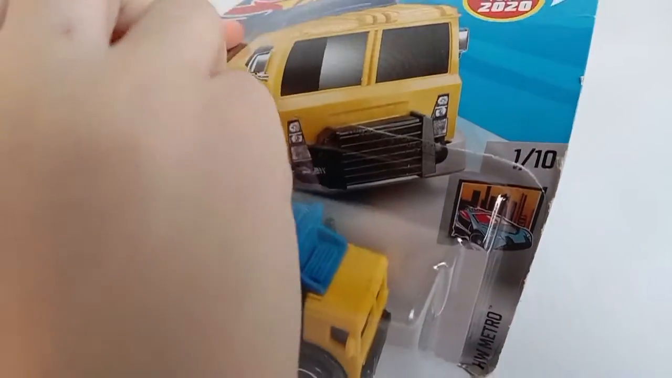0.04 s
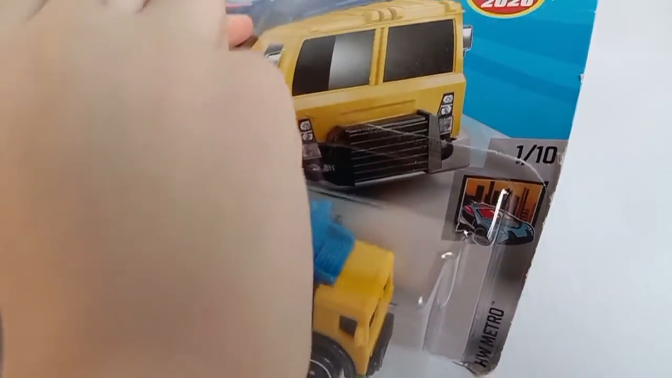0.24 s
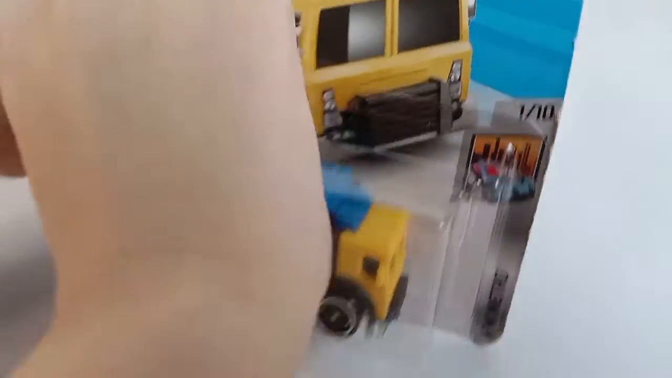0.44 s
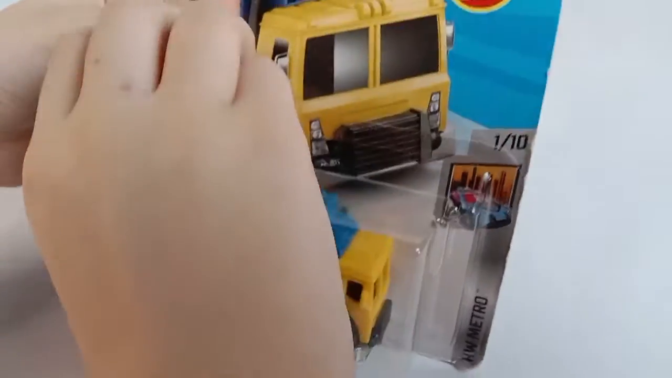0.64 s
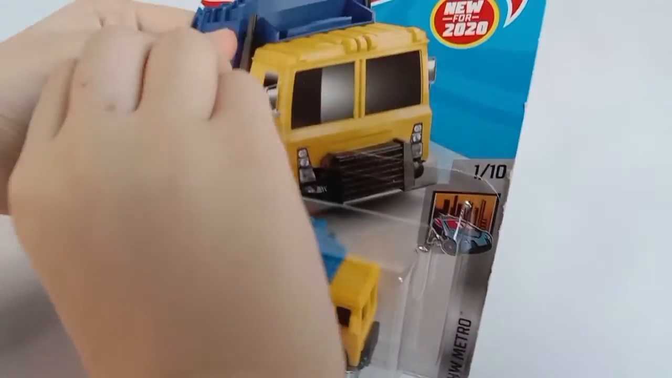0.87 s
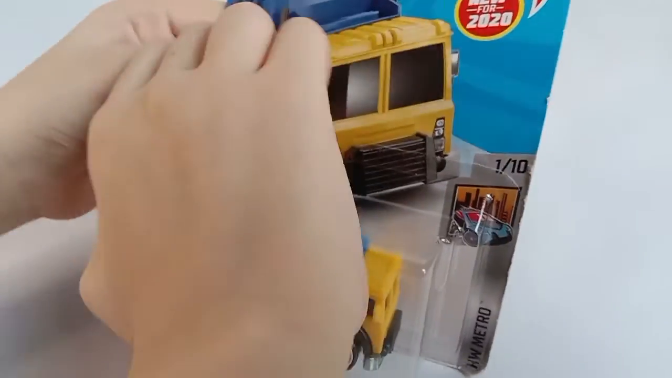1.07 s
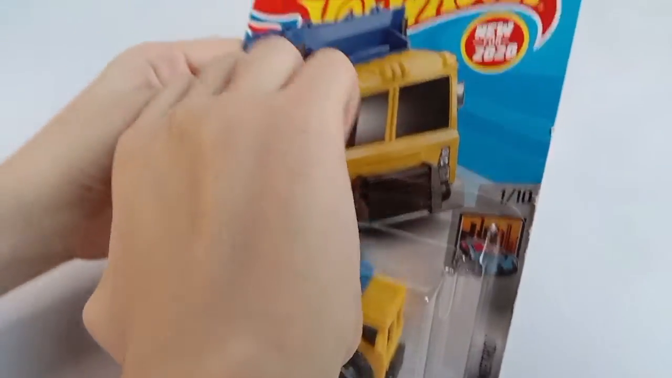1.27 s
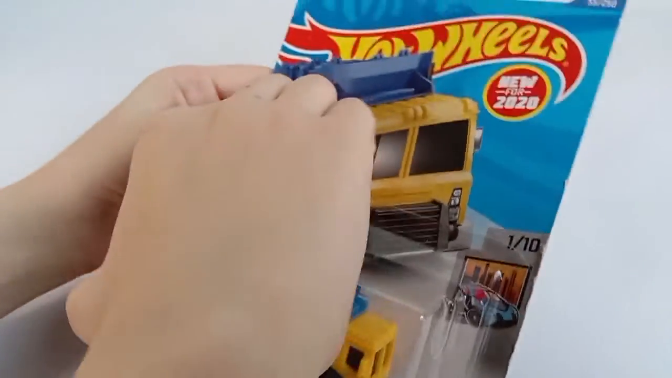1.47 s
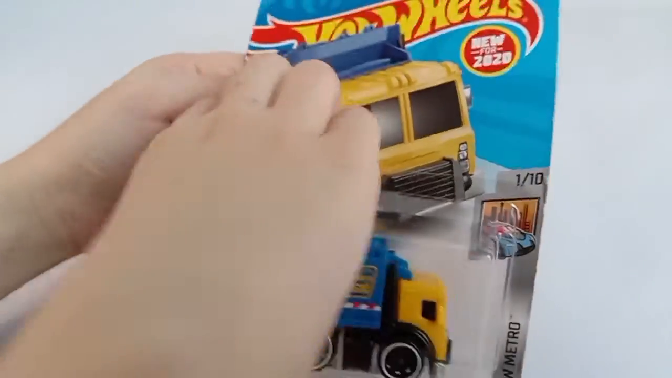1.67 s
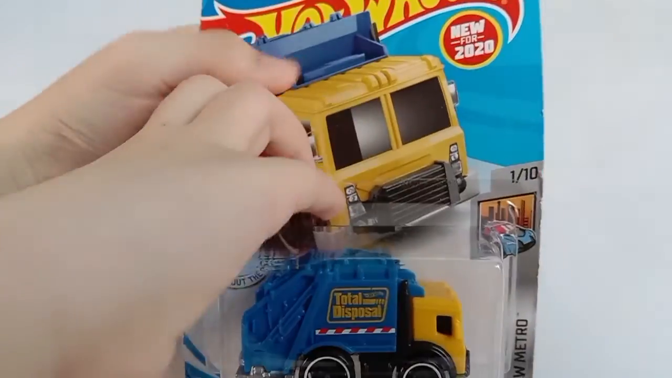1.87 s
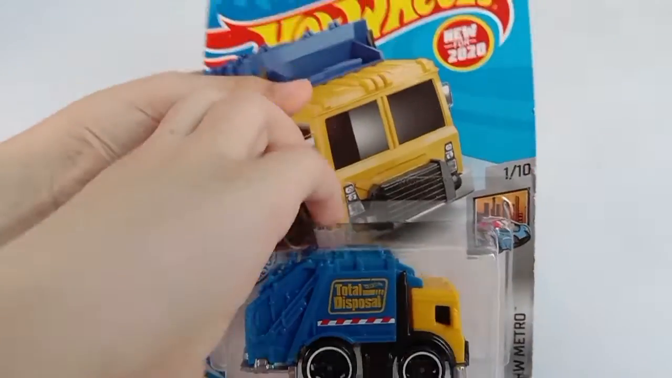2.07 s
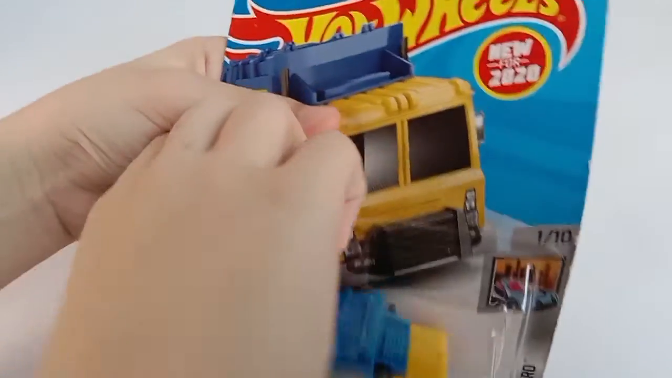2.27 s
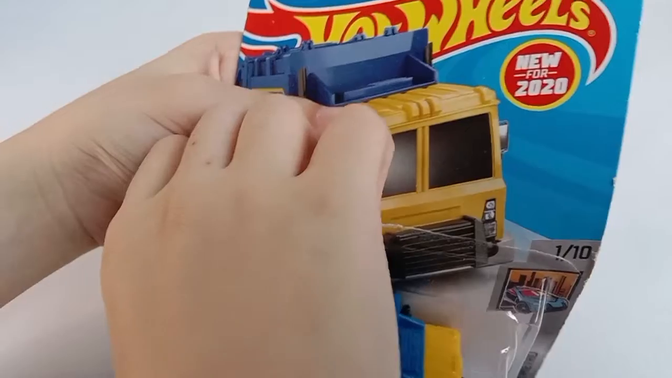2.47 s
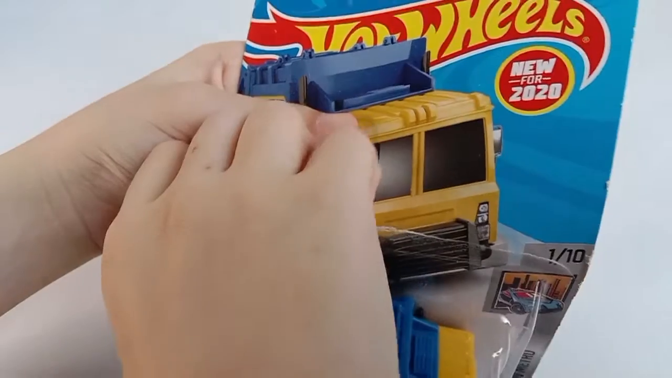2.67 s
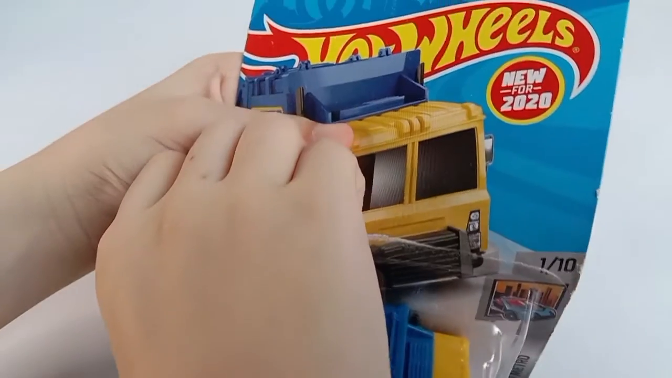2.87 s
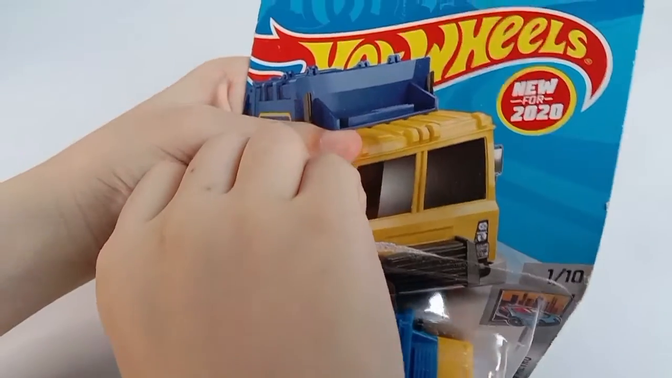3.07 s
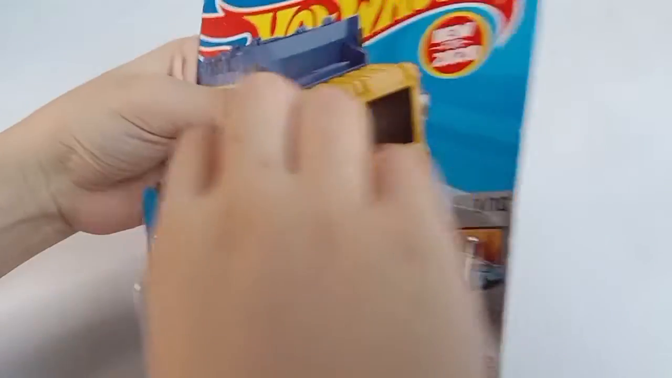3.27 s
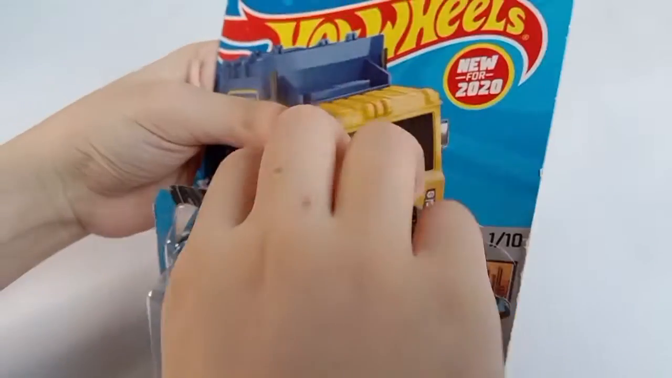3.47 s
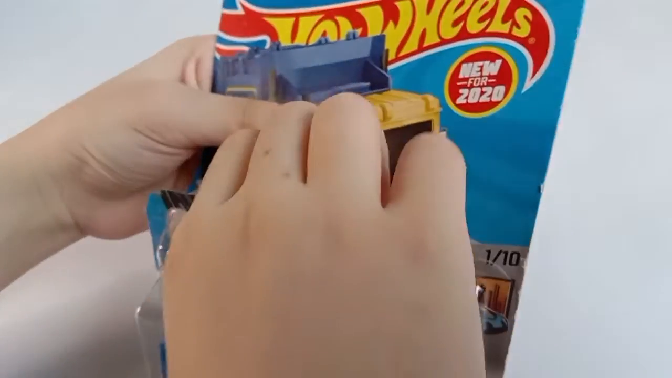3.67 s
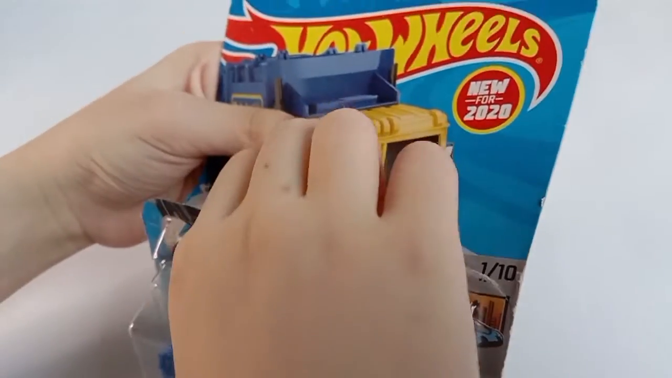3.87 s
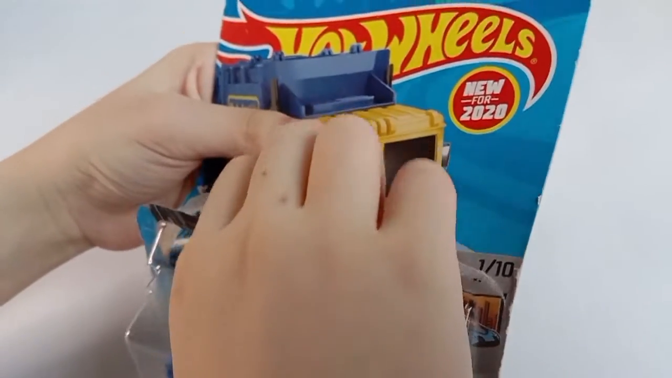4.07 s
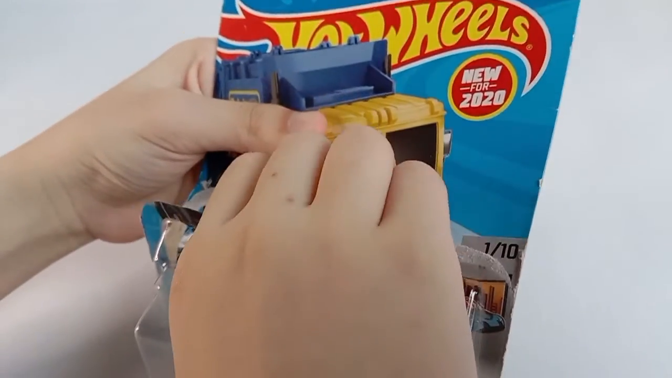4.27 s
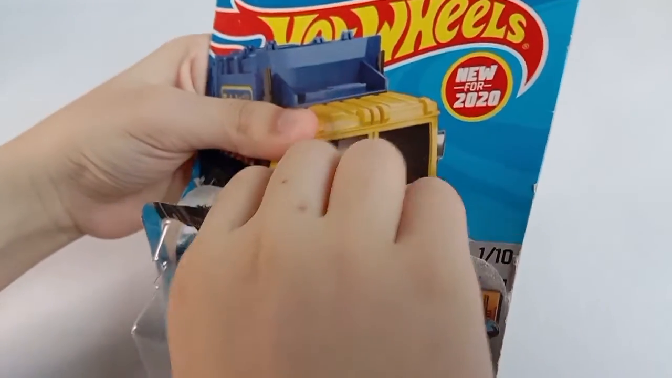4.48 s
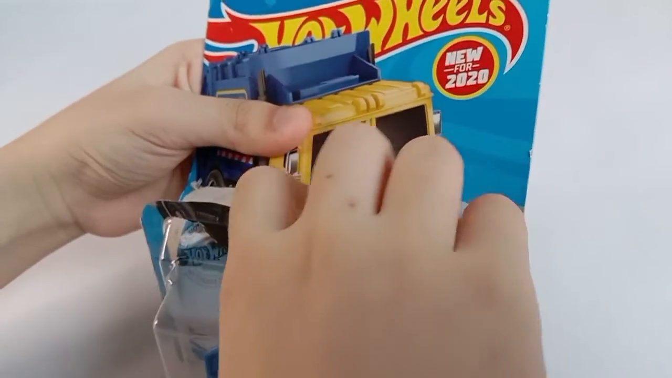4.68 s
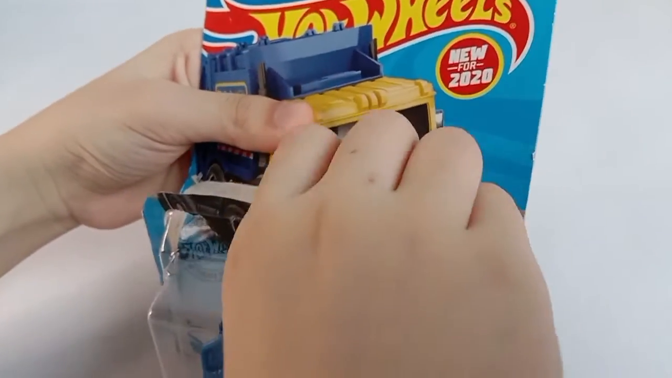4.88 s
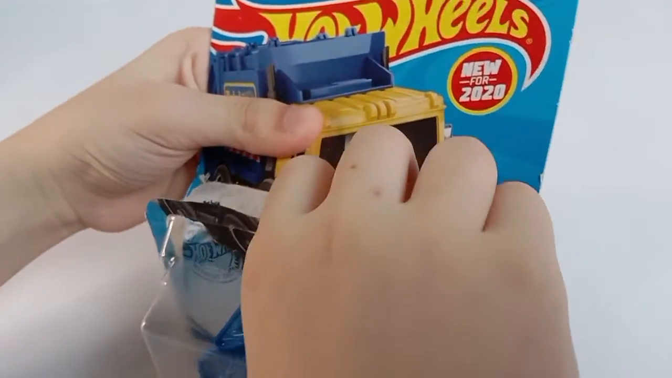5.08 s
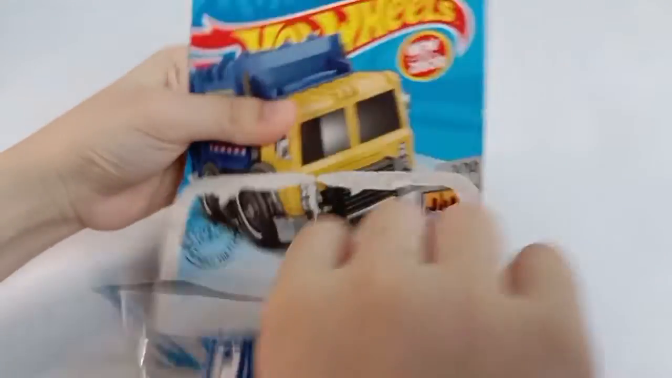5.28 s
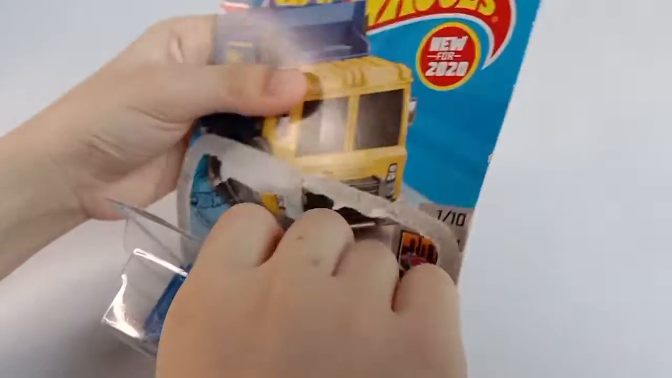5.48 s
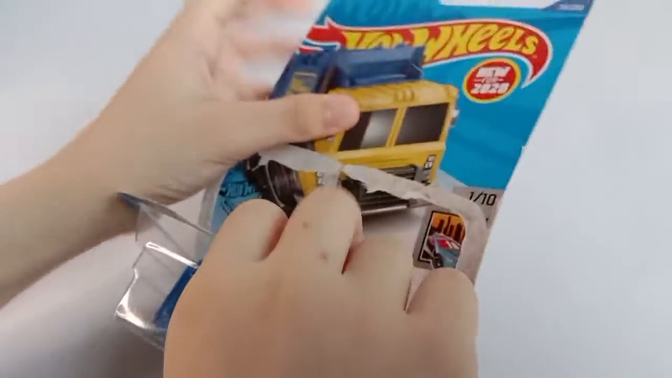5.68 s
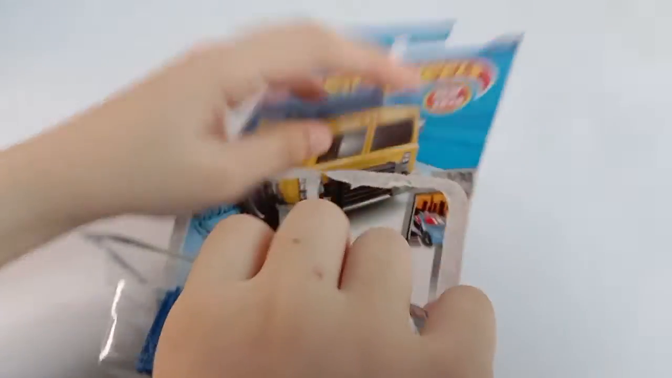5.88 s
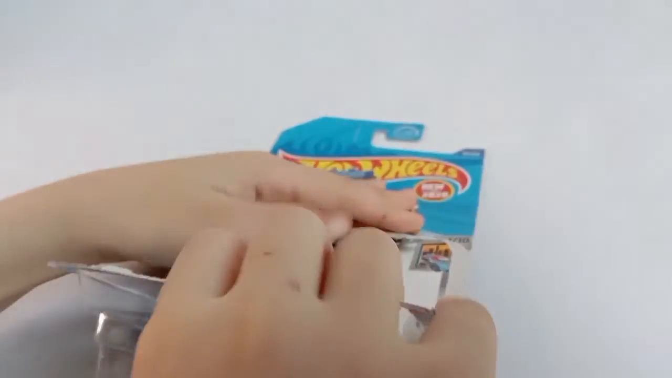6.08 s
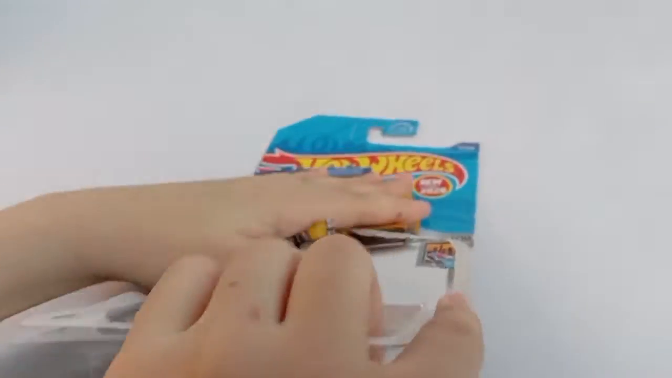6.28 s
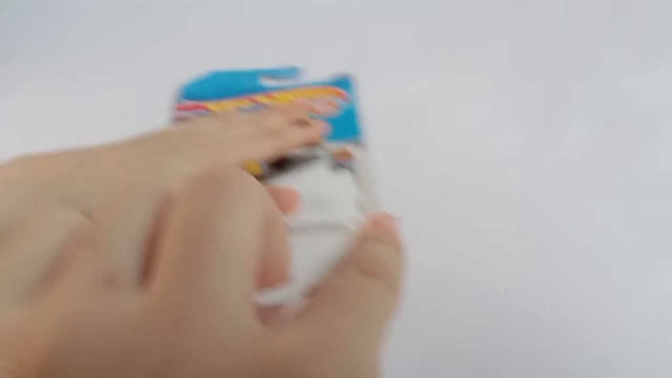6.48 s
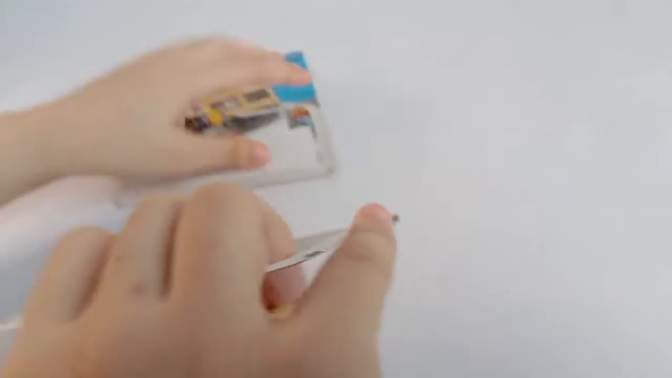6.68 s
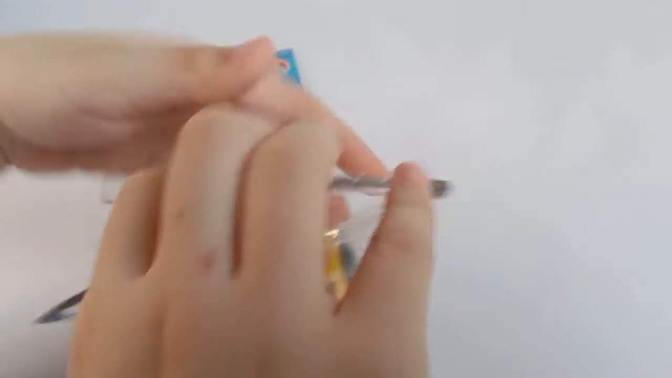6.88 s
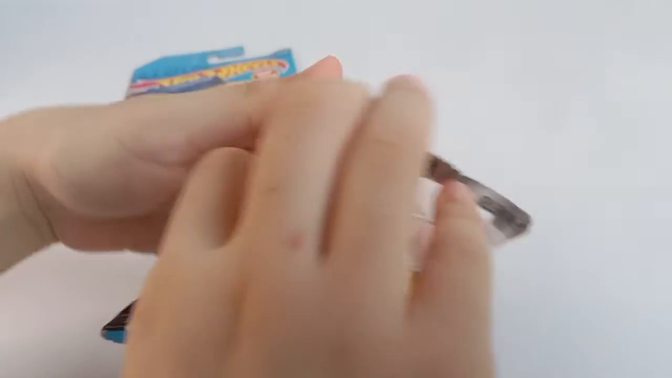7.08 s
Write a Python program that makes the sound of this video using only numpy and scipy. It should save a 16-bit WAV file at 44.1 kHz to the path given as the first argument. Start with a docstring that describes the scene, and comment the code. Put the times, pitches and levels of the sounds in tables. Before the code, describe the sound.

Close to the microphone in a small room, hands work at a plastic blister glued to card. Light clicks and faint rubbing come first, then isolated sharp pops between quiet gaps. The seam gives way in a dense, loud ripping crackle with dull card thumps. After a lull, another tight cluster of bright snaps follows, fading into soft rustling over faint room hiss.

```python
"""A small room, with the microphone close: hands tear a thin plastic blister off its cardboard backing.
The blister buckles in sharp snaps: clicks ring its shell, and the card thumps under some of them.
The glue seam rips in a dense crackle of random clicks; handling scrapes, groans or thuds as gliding noise.
Air shut in the blister rings for a while; wall reflections and a faint room tone lie behind it all."""
import sys
import numpy as np
from scipy import signal
from scipy.io import wavfile
from scipy.ndimage import uniform_filter1d

SR = 44100
rng = np.random.default_rng(int(sys.argv[2]) if len(sys.argv) > 2 else 0)


def wrap_up_sound(samples):
    """Save the sound to the file named by the first command line argument, as 16-bit audio."""
    columns = np.atleast_2d(samples).T
    # keep every value between -1 and 1, then stretch to whole-number steps
    tamed = np.clip(columns, -1, 1)
    steps = np.round(tamed * 32767).astype(np.int16)
    wavfile.write(sys.argv[1], SR, steps)


N = 314874
EDGE_HZ = 16300  # upper band limit
BINS = np.fft.rfftfreq(4096, 1 / SR) + 1  # frequencies of every filter curve, Hz; +1 avoids zero
OPENS_S = 5.15  # the seam gives way
THUMP_LOW_HZ, THUMP_HIGH_HZ = 140, 350  # the card thumps between these, the snaps lie above


def gain_of(db):
    """Decibels to amplitude."""
    return 10 ** (np.asarray(db) / 20)


def evened(x):
    """Scales to rms 1."""
    return x / np.sqrt(np.mean(x ** 2) + 1e-20)


def read(points, hz):
    """Reads a curve on a log-frequency axis."""
    point_hz, value = np.transpose(points)
    return np.interp(np.log(hz + 1), np.log(point_hz + 1), value)


def add(mix, start_s, sound):
    """Mixes a sound in at start_s, cut off at the end of the scene."""
    part = mix[max(round(start_s * SR), 0):][:len(sound)]
    part += sound[:len(part)]


def wander(per_s):
    """Slow chance: a new random value per_s times a second, joined by straight lines."""
    return np.interp(np.arange(N) * per_s / SR, np.arange(N), rng.standard_normal(N))


def ripple(order=14):
    """Fine peaks and dips of a spectrum, as of one spot on the plastic; rms 1 on BINS."""
    once = uniform_filter1d(rng.standard_normal(len(BINS)), order)
    return evened(uniform_filter1d(once, order))


def peak(hz, width_hz):
    """Power response of one resonance on BINS, 1 at its top."""
    return 1 / (1 + (2 * (BINS - hz) / width_hz) ** 2)


def region(hz, octaves=0.74):
    """The broad lift of one crease or spot around its pitch, 1 at its top."""
    return np.exp(-(np.log2(BINS / hz) / octaves) ** 2)


def colour(x, curve_db):
    """Causal (minimum-phase) filter with the given gain on BINS: it rings after a click, never before."""
    log_gain = np.log(gain_of(np.maximum(curve_db, -100)))
    circle = np.concatenate([log_gain, log_gain[-2:0:-1]])
    spectrum = np.exp(np.conj(signal.hilbert(circle)))
    response = np.fft.ifft(spectrum).real
    return signal.oaconvolve(x, response)[:len(x)]


def struck(force, curve_db):
    """What a short force sets ringing, at level 1 over 10 ms."""
    ring = colour(force, curve_db)
    return ring / np.linalg.norm(ring) * np.sqrt(SR / 100)


def quiver(hz, width_hz):
    """Narrow noise of rms 1 that follows a pitch curve: a slow complex wobble turned by the pitch."""
    r = np.exp(-np.pi * abs(width_hz) / SR)
    a, b = rng.standard_normal((2, len(hz) + SR // 10))  # the extra 0.1 s lets the filter settle
    wobble = signal.lfilter([1], [1, -2 * r, r * r], a + 1j * b)[-len(hz):]
    turning = np.exp(2j * np.pi * np.cumsum(hz) / SR)
    return evened((wobble * turning).real)


# broad colour of the pack: pitch_hz [Hz], gain_db [dB]
PACK_COLOUR = [(40, 31), (110, 0.5), (220, 2.5), (320, -10), (700, -1), (1000, -1.5), (1450, 3),
               (1900, 2.5), (3400, 3), (4900, -8.5), (7500, -5), (9300, -27), (16000, -27.5)]
# resonances of the blister shell: pitch_hz [Hz], width_hz [Hz], lift_db [dB]
SHELL_MODES = [(952, 154, 13), (1245, 51, 8), (1375, 168, 8.5), (2470, 54, 5.5)]


def pack_db(low_hz, high_hz, tuning=1):
    """Response of the pack with its shell resonances, within one band; their pitch is multiplied by tuning."""
    lifts = sum(lift_db * peak(hz * tuning, width_hz) for hz, width_hz, lift_db in SHELL_MODES)
    band = -10 * np.log10((1 + (low_hz / BINS) ** 8) * (1 + (BINS / high_hz) ** 8))
    return read(PACK_COLOUR, BINS) + lifts + band


# colour of the room tone: pitch_hz [Hz], gain_db [dB, relative]
HISS_COLOUR = [(30, -25.5), (65, 13.5), (250, -9.5), (700, -11), (1400, -15), (3700, -1), (4800, -26.5),
               (7000, -4.5), (9500, -41), (16000, -43)]


def room_tone(level_db=-62, ripple_db=3):
    """Steady noise with a coloured spectrum; its level wavers slightly."""
    curve_db = read(HISS_COLOUR, BINS) + ripple_db * ripple()
    hiss = evened(colour(rng.standard_normal(N), curve_db))
    return gain_of(level_db + 2 * wander(per_s=16)) * hiss


# pulls at the seam and rubs of the fingers:
# start_s [s], length_s [s], crackle_db [dB, drive of the shell], fizz_db [dB, drive of the surfaces]
PULLS = [(0.159, 0.16, -46.5, -49.5), (0.379, 0.077, -50.5, -69), (0.719, .11, -44, -54.5),
         (0.849, 0.22, -49, -45.5), (1.167, 0.18, -33.5, -39.5), (1.334, 0.15, -50, -54),
         (1.5, 0.13, -44.5, -54.5), (1.651, 0.23, -52, -60.5), (2.01, 0.23, -53.5, -66),
         (2.153, 0.16, -50.5, -64), (2.59, 0.036, -42, -53.5), (2.842, 0.3, -87, -58.5),
         (3.341, 0.028, -29.5, -50), (3.547, 0.34, -50.5, -54), (3.768, 0.048, -31, -33),
         (3.863, 0.037, -42.5, -42.5), (3.931, 0.32, -58, -52), (4.084, 0.081, -40.5, -42.5),
         (4.2, 0.12, -42, -46), (4.537, 0.098, -44.5, -56.5), (4.86, 0.16, -49.5, -60.5),
         (5.145, 0.1, -26.5, -37.5), (5.257, 0.19, -35, -45.5), (5.726, 0.18, -55, -61.5),
         (5.9, 0.11, -46.5, -58.5), (6.035, 0.12, -50, -50.5), (6.187, 0.02, -25, -30),
         (6.317, 0.074, -30, -40.5), (6.398, 0.22, -48.5, -56), (6.65, 0.66, -59, -83),
         (6.931, 0.019, -39, -44), (7.047, 0.21, -57.5, -62)]
ATTACK_S, SWELL_DB, RELEASE_S = 0.034, 4, 0.02
GRIP_CRACKLE_DB, GRIP_FIZZ_DB = -68.5, -73  # faint rustle of the grip alone


def effort():
    """Drive of crackle and fizz: the steady grip plus pulls that take hold, swell and die, summed as power."""
    crackle_power = np.full(N, gain_of(GRIP_CRACKLE_DB) ** 2)
    fizz_power = np.full(N, gain_of(GRIP_FIZZ_DB) ** 2)
    for start_s, length_s, crackle_db, fizz_db in PULLS:
        t = np.arange(0, length_s + 10 * RELEASE_S, 1 / SR)
        swell = gain_of(SWELL_DB * (np.sin(np.pi * np.minimum(t / length_s, 1)) - 1))
        attack = np.minimum(t / ATTACK_S, 1)
        release = np.exp(-np.maximum(t - length_s, 0) / RELEASE_S)
        shape = attack * swell * release
        add(crackle_power, start_s, (gain_of(crackle_db) * shape) ** 2)
        add(fizz_power, start_s, (gain_of(fizz_db) * shape) ** 2)
    return np.sqrt([crackle_power, fizz_power])


def crackle(per_s, spread_db, smooth):
    """Fibres and glue letting go: random clicks, a few of them large, over smooth friction."""
    size = gain_of(spread_db * np.minimum(rng.exponential(1, N), 3.6))
    clicks = size * rng.choice([-1, 1], N) * (rng.random(N) < per_s / SR)
    return evened(evened(clicks) + smooth * rng.standard_normal(N))


def cavity_air(body, loosens_s=1.45, air_hz=900, width_hz=118, air_db=-6, squeeze=0.054, most_db=-41):
    """Air shut in the blister rings from when the hand loosens until the seam gives way."""
    t = np.arange(N) / SR
    pitch = air_hz * (1 + squeeze * wander(per_s=10))  # the grip shifts it
    ring = quiver(pitch, width_hz) * (t > loosens_s) * (t < OPENS_S)
    damping = gain_of(air_db + 7 * np.tanh(wander(per_s=19)))  # the grip damps it now more, now less
    return ring * damping * np.minimum(body, gain_of(most_db))  # harder pulls ring it no louder


def card_flex(lump_db=0.5):
    """The card bends in uneven lumps: low noise through the pack."""
    flex = evened(colour(rng.standard_normal(N), pack_db(low_hz=90, high_hz=282)))
    return flex * gain_of(lump_db * np.tanh(wander(per_s=37)))


# colour of the surface fizz: pitch_hz [Hz], gain_db [dB]
FIZZ_COLOUR = [(2000, -37), (4000, -10.5), (7800, 0), (9300, -19), (11200, -18.5), (13000, -9.5),
               (16000, -23.5)]


def rubbing(shell_db=-1, flex_db=-15, jerk_db=3, spot_db=4.5, shift_db=5.5, region_db=11):
    """Jerky pulls crackle at six spots, each with its own pitch; they ring shell and air, fizz, flex the card."""
    body, surface = effort() * gain_of(jerk_db * wander(per_s=75))
    shell, fizz = np.zeros(N), np.zeros(N)
    for hz in np.geomspace(850, 3460, 6):
        shifting = gain_of(shift_db * np.tanh(wander(per_s=34)))  # the pull moves from spot to spot
        grains = crackle(per_s=230, spread_db=5.0, smooth=0.83) * shifting
        spot = spot_db * ripple()
        shell_curve = pack_db(low_hz=1140, high_hz=4050) + spot + region_db * region(hz)
        shell += evened(colour(grains, shell_curve))
        fizz += evened(colour(grains, read(FIZZ_COLOUR, BINS) + spot))
    pack = gain_of(shell_db) * evened(shell) + gain_of(flex_db) * card_flex()
    return body * pack + cavity_air(body) + surface * evened(fizz)


# how fast the reflections die: pitch_hz [Hz], fall_s [s to fall 60 dB]
ROOM_DECAY = [(300, 0.18), (1200, 0.21), (3000, 0.28), (15000, 0.23)]


def room(x, gap_s=.011, size=16384):
    """Dense wall reflections, each band dying at its own speed; redrawn in blocks as the pack moves."""
    out, n = np.zeros(N), SR // 2
    window = signal.windows.cosine(size)
    padded = np.pad(x, (size // 2, size))
    for start in range(0, N, size // 2):
        taps = rng.choice([-1., 1.], n) * (rng.random(n) < 4000 / SR)  # 4000 reflections a second
        taps *= np.arange(n) > gap_s * SR
        hz, t, z = signal.stft(taps, SR, nperseg=256)
        fading = gain_of(-60 * t / read(ROOM_DECAY, hz)[:, None])
        tail = signal.istft(z * fading, SR, nperseg=256)[1]
        echo = signal.fftconvolve(window * padded[start:start + size], tail / np.linalg.norm(tail))
        early = max(size // 2 - start, 0)  # samples that fall before the scene begins
        add(out, (start + early - size // 2) / SR, echo[early:])
    return out


# snaps of the blister, and one softer echo off a wall at 3.224 s:
# start_s [s], level_db [dB], brightness_db [dB per octave near the pivot],
# pitch_hz [Hz, of the crease], buckle_s [s, time scale of the buckle]
SNAPS = [(0.1118, -44.5, 7, 3600, 0.00036), (0.1835, -29, 11.5, 6450, 0.0012),
         (0.186, -34, -20, 570, 0.0055), (0.2676, -30, -6, 606, 0.00032), (0.283, -33.5, 9, 7500, 0.0011),
         (0.313, -28.5, 7.5, 8600, 0.0004), (0.4739, -32, 1.5, 660, 0.00067),
         (0.526, -29, 0.5, 546, 0.0039), (0.598, -25, 5.5, 1030, 0.0037), (0.6099, -28, 2.5, 2600, 0.0014),
         (.818, -36, -8.5, 1190, 0.0029), (1.014, -42, 2, 680, 0.0065), (1.168, -35, 3.5, 2650, 0.0037),
         (1.383, -36, 1.5, 770, .004), (1.568, -41, 1.5, 1450, 0.0028), (2.301, -44.5, 20, 13000, 0.0022),
         (2.3808, -20.5, -4.5, 1210, 0.0035), (2.385, -15.5, -0.5, 1500, 0.0014),
         (2.421, -32.5, 2, 6000, 0.0014), (2.444, -38, 3, 1280, .002), (3.124, -46.5, 5.5, 2770, 0.00083),
         (3.2, -13.5, 2, 1350, 0.0016), (3.224, -23, 3.5, 1300, 0.015), (3.357, -25, -3, 810, 0.0045),
         (3.8, -30.5, 0.5, 1000, 0.0024), (4.239, -29.5, 11, 1320, 0.0024), (4.3609, -12, 0.5, 1180, 0.002),
         (4.515, -34, 7, 1240, 0.0019), (4.5234, -19.5, -0.5, 850, 0.0043), (4.77, -19, -5.5, 1900, 0.0058),
         (5.2087, -20.5, 6, 1320, 0.0022), (5.216, -21, -0.5, 1280, 0.0021),
         (5.258, -25.5, 1.5, 3140, 0.0024), (5.273, -25, 1.5, 2620, 0.0035),
         (5.3092, -18.5, 3.5, 1120, 0.014), (5.3232, -16, 4.5, 1640, 0.0043),
         (5.371, -22.5, 1.5, 2200, 0.0052), (5.425, -19.5, 1, 1310, 0.0045),
         (6.1752, -20.5, 9.5, 3940, 0.0028), (6.276, -16.5, 0, 2250, 0.0027), (6.305, -16, 8, 6440, 0.0011),
         (6.3318, -14.5, -1.5, 4800, 0.0021), (6.967, -28.5, 5, 1630, 0.0068)]
CREASE_DB, PIVOT_HZ, TILT_OCTAVES = 8.5, 2500, 1.88  # the tilt levels off this far from the pivot
SETTLE_DB, SETTLE_S, SETTLE_PER_S = -13, .027, 820  # crinkle: level under the snap, decay, grains a second
DOME_HZ, DOME_WIDTH_HZ, DOME_DB = 538, 132, 11  # knock of the dome while it is still glued down


def snaps(first=1.0, per_s=6000, spot_db=3.0, lead=0.025, detune=0.028):
    """A crease creaks, pops through in a dying run of buckles, and crinkles as it settles.
    The wall echo is made in the same way.
    Returns the sound at the microphone and the smoother sum of what is thrown in all directions."""
    near, thrown = np.zeros(N), np.zeros(N)
    t = np.arange(-512, 8192) / SR  # 0 is the pop itself
    octaves = TILT_OCTAVES * np.tanh(np.log2(BINS / PIVOT_HZ) / TILT_OCTAVES)
    for start_s, level_db, brightness_db, pitch_hz, buckle_s in SNAPS:
        age = abs(t) / buckle_s  # a slow buckle also builds up slowly
        force = np.where(t < 0, lead * np.exp(-age), np.exp(-age / 2.1))
        buckles = force * rng.standard_normal(len(t)) * (rng.random(len(t)) < per_s / SR)
        buckles += first * (t == 0)
        settling = (t > buckle_s) * np.exp(-t / SETTLE_S)
        crinkle = settling * rng.standard_normal(len(t)) * (rng.random(len(t)) < SETTLE_PER_S / SR)
        tuning = 1 + detune * rng.uniform(-1.3, 1)  # bending retunes the shell
        shell = pack_db(THUMP_HIGH_HZ, EDGE_HZ, tuning)
        shell += brightness_db * octaves + CREASE_DB * region(pitch_hz)
        shell += DOME_DB * peak(DOME_HZ, DOME_WIDTH_HZ) * (start_s < OPENS_S)
        pop = struck(buckles, shell + spot_db * ripple())
        pop += gain_of(SETTLE_DB) * struck(crinkle, shell)
        add(near, start_s + t[0], gain_of(level_db) * pop)
        add(thrown, start_s + t[0], gain_of(level_db) * struck(1. * (t == 0), shell))
    return near, thrown


# gliding noises of handling: start_s [s], length_s [s], level_db [dB], start_hz [Hz], end_hz [Hz]
GLIDES = [(0.181, 0.081, -44, 142, 108), (0.738, 0.08, -42.5, 780, 802), (0.782, 0.14, -50, 633, 484),
          (0.818, 0.096, -49, 250.4, 211), (1.198, 0.077, -36.5, 500, 920), (1.272, 0.06, -50.5, 229, 204),
          (1.542, 0.082, -57, 1002, 584), (1.594, 0.063, -57, 226, 205), (2.591, 0.076, -58, 1114, 882),
          (3.362, 0.0755, -44, 146, 174), (3.489, 0.16, -43.5, 137.6, 209.5), (5.317, 0.069, -28, 113, 146),
          (5.942, 0.054, -60, 242, 256), (6.204, 0.062, -41.5, 160, 111), (6.342, 0.076, -39, 158, 90)]
GLIDE_WIDTH = 0.35  # width of the noise, as a share of its starting pitch


def glides(taper=0.12):
    """Gliding narrow noises of handling: high ones scrape, low ones groan or thud softly."""
    out = np.zeros(N)
    for start_s, length_s, level_db, start_hz, end_hz in GLIDES:
        n = int(length_s * SR)
        glide = quiver(np.geomspace(start_hz, end_hz, n), GLIDE_WIDTH * start_hz)
        add(out, start_s, gain_of(level_db) * glide * signal.windows.tukey(n, taper))
    return out


# thumps of the card: start_s [s], level_db [dB]
THUMPS = [(0.1843, -31), (0.2682, -33.5), (0.525, -38), (0.6, -42.5), (1.168, -49.5), (2.4212, -42.5),
          (3.2, -39.5), (4.3603, -24.5), (4.5234, -34), (5.217, -30), (5.3233, -17.5), (5.4245, -28.5),
          (6.3325, -32.5)]


def thumps(decay_s=0.0038):
    """The card springs back under some of the snaps: a short, dull push of dying noise."""
    out, t = np.zeros(N), np.arange(4096) / SR
    card = pack_db(THUMP_LOW_HZ, THUMP_HIGH_HZ)
    for start_s, level_db in THUMPS:
        push = np.exp(-t / decay_s) * rng.standard_normal(len(t))
        add(out, start_s, gain_of(level_db) * struck(push, card))
    return out


def scene(snap_room_db=-10.5, rub_room_db=-9):
    """The pack, its reflections in the room, and the room tone."""
    pops, thrown = snaps()
    handling = rubbing() + glides() + thumps()
    reflections = room(gain_of(snap_room_db) * thrown + gain_of(rub_room_db) * handling)
    return (pops + handling + reflections + room_tone())[None]


def record(dry, ceiling=0.6, low_hz=48):
    """A small microphone drops the deepest bass, the loudest peaks are rounded off; then the band limit."""
    bass_cut = signal.butter(2, low_hz, "highpass", fs=SR, output="sos")
    thinned = signal.sosfilt(bass_cut, dry)
    rounded = ceiling * np.tanh(thinned / ceiling)
    band_limit = signal.firwin(511, EDGE_HZ, window=("kaiser", 9), fs=SR)
    return signal.oaconvolve(rounded, band_limit[None], "same")


dry = scene()
out = record(dry)
wrap_up_sound(out)
```